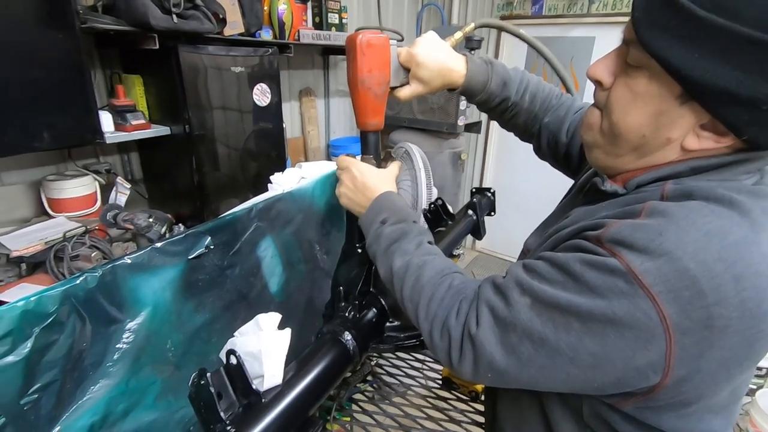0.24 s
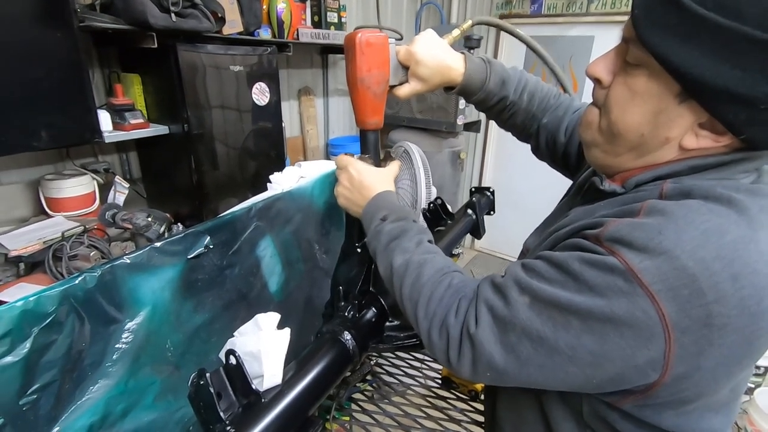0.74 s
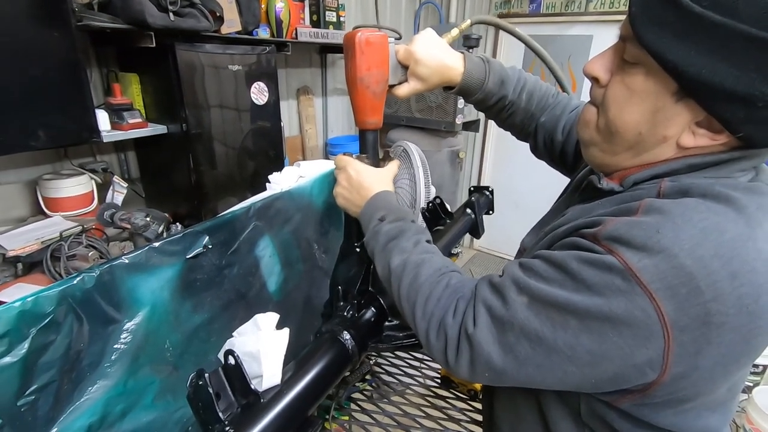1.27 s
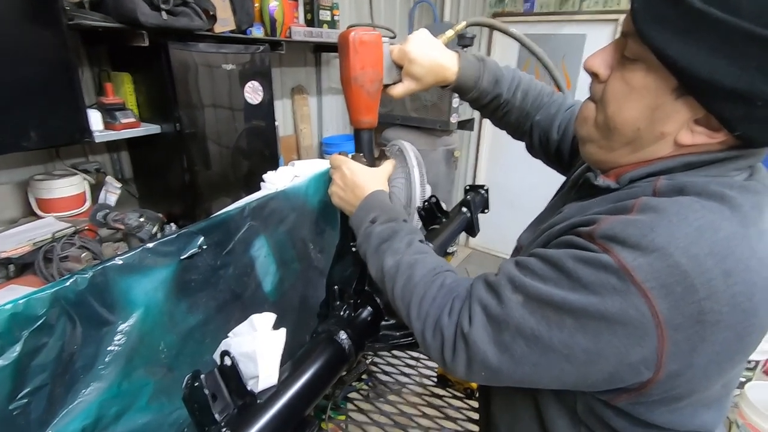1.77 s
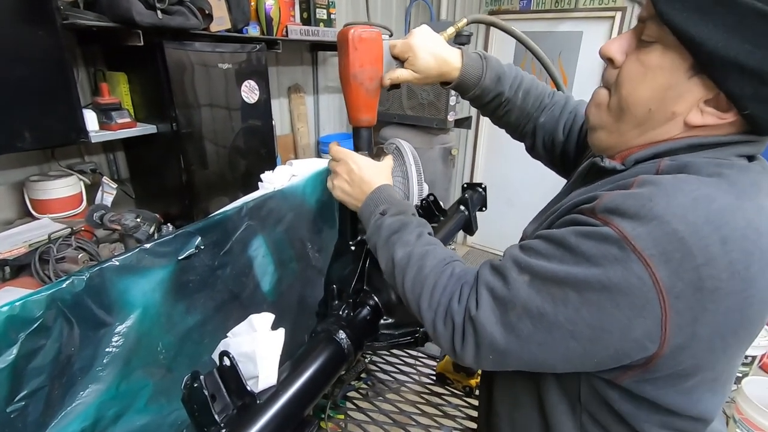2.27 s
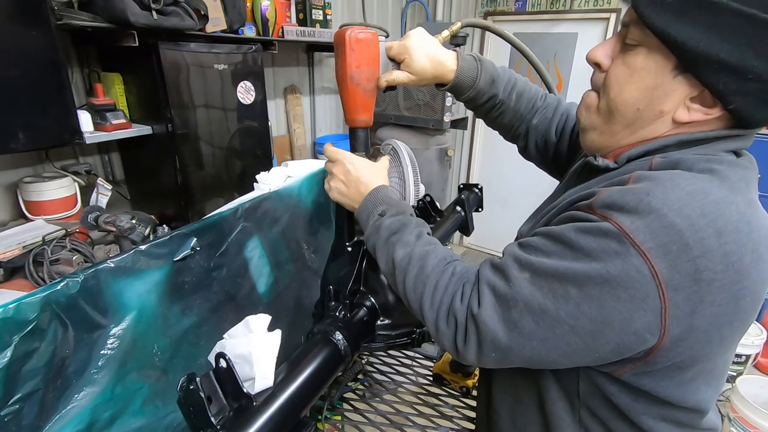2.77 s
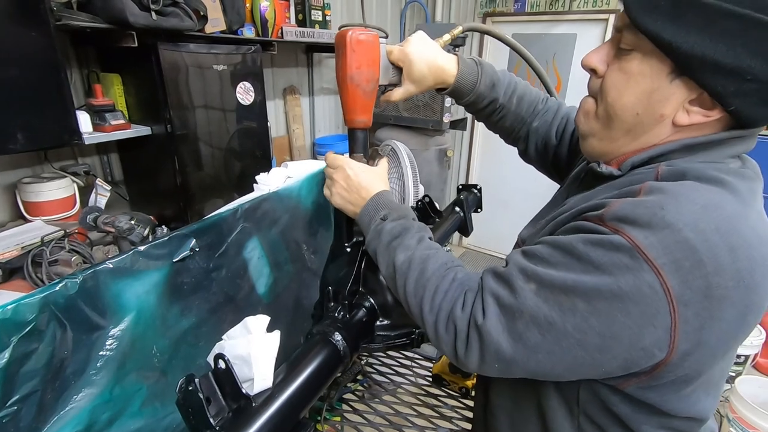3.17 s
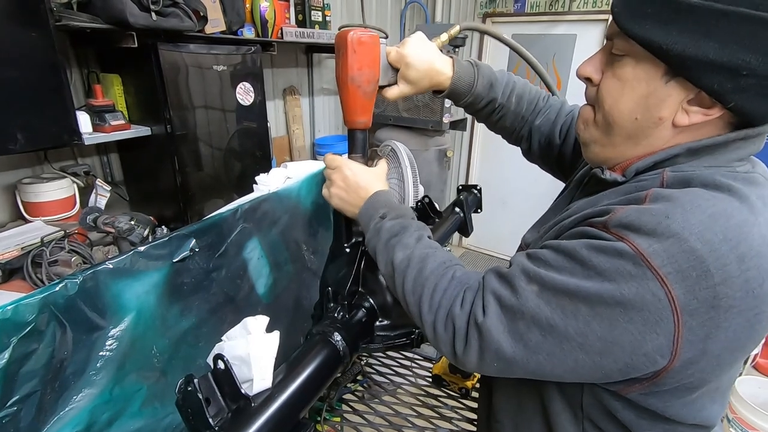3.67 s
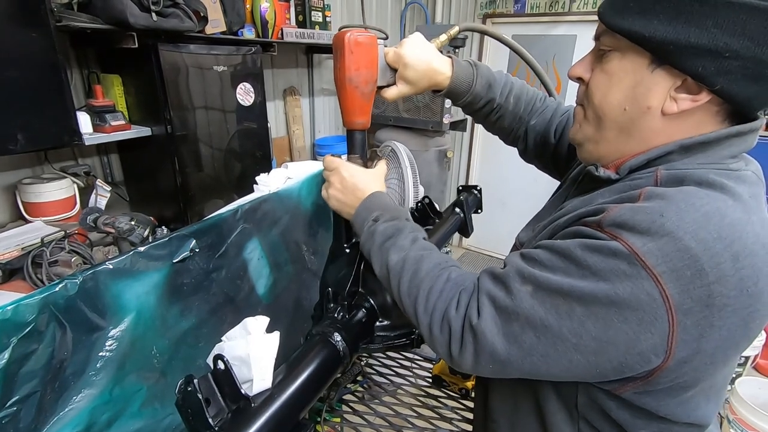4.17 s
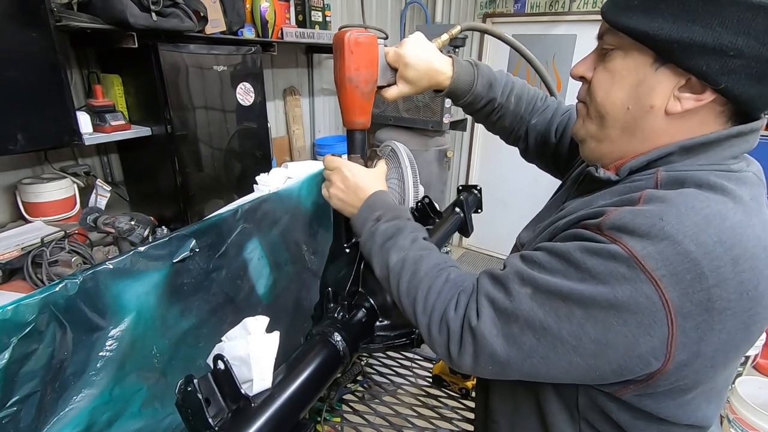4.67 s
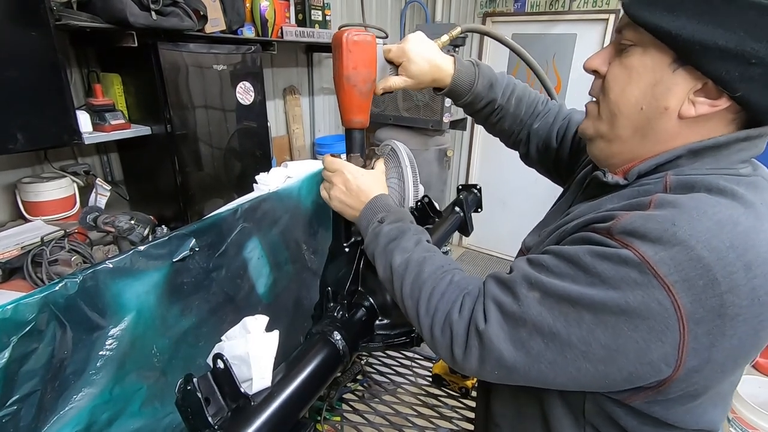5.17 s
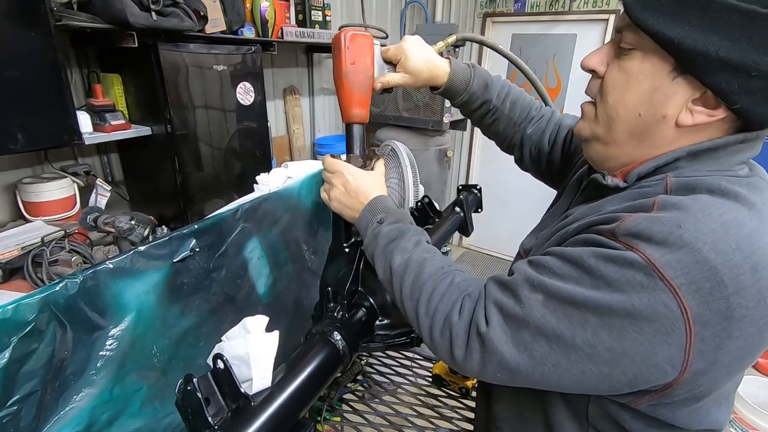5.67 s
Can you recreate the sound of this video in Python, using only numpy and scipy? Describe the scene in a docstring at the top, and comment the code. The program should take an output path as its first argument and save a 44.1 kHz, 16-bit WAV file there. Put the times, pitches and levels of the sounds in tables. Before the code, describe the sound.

From 0 to about 2.0 s an air impact wrench hammers at full force, roughly fifteen blows a second. Every blow is a hard, bright steel crack ringing the socket and heavy axle housing, uneven in strength and tone, with clacks and rattle between. Air hisses out and the motor throbs upward after each blow, over low gusty rumble. At 2.0 s the valve shuts with a shrill, ringing spit and the motor quickly runs down. Until 3.4 s there is a low drone and swelling faint hiss, with soft metallic clunks at about 2.1, 2.3, 2.5, 2.8 and 2.95 s. Loose jolts and dull thumps start the second burst, 3.43 to 5.0 s; from 4.74 s the exhaust eases, blows dull, and bleeding air whistles, dying soon after 5 s. Quiet drone remains, with a faint thump near 5.4 and a firmer cluster of clunks around 5.75-5.83 s. Close microphones, short garage reverberation.

```python
"""A pneumatic impact wrench hammers a big axle nut in two bursts in a small, cluttered garage.
Each blow is a hard pulse that rings anvil, socket and axle housing, with cam clacks and rattle in between.
It stalls the vane motor, which spins up again, venting noise and thumps at ever shorter gaps.
The valve spits after the first burst and bleeds a whistle around the end of the second.
In both pauses the socket clunks by hand, over a low drone, a faint hiss and a low rumble that fades out late."""
import sys
import numpy as np
from scipy import signal
from scipy.fft import rfft, irfft, next_fast_len
from scipy.io import wavfile

SR = 44100
rng = np.random.default_rng(int(sys.argv[2]) if len(sys.argv) > 2 else 0)


def to_wav(s):
    """Save 16-bit WAV."""
    ch = np.atleast_2d(s).T  # columns
    pcm = np.round(np.clip(ch, -1, 1) * 32767)  # PCM
    wavfile.write(sys.argv[1], SR, pcm.astype(np.int16))


N = 261513  # length in samples


def undb(db):
    """Decibels to gain."""
    return 10 ** (np.asarray(db) / 20)


def unit(x):
    """Scale to rms 1."""
    return x / np.sqrt(np.mean(x ** 2))


def curve(rows, axis):
    """One column of a table, joined by straight lines in time."""
    rows = np.array(rows)
    return np.interp(np.arange(N) / SR, rows[:, 0], rows[:, axis])


def since(s):
    """Seconds gone by since s; zero before it."""
    return np.maximum(np.arange(N) / SR - s, 0)


def through(x, response):
    """Pass a sound through an impulse response."""
    return signal.fftconvolve(x, response)[:N]


def colour(x, points, size=8192):
    """Minimum-phase filter of unit energy with the given (Hz, dB) shape."""
    hz, db = np.transpose(points)
    f = np.maximum(np.fft.rfftfreq(size, 1 / SR), 1)
    log_gain = np.log(undb(np.interp(np.log(f), np.log(hz), db)))
    # folding the cepstrum forward in time makes the filter causal
    cepstrum = irfft(log_gain)
    cepstrum[1:size // 2] *= 2
    cepstrum[size // 2 + 1:] = 0
    response = irfft(np.exp(rfft(cepstrum)))
    return through(x, response / np.linalg.norm(response))


def ring(x, modes):
    """Decaying sines set off by x: one two-pole resonator for each mode (Hz, dB, t60 s)."""
    out = 0
    for hz, db, t60 in modes:
        r = np.exp(-np.log(1000) / (t60 * SR))
        w = 2 * np.pi * hz / SR
        feedback = [1, -2 * r * np.cos(w), r * r]
        out = out + undb(db) * signal.lfilter([0, r * np.sin(w)], feedback, x + 1e-18)
    return out


def taps(times, sizes):
    """One impulse for each event."""
    out = np.zeros(N)
    index = np.clip(np.ravel(times) * SR, 0, N - 1).astype(int)
    np.add.at(out, index, np.ravel(sizes))
    return out


def chatter(pulses, decay_s):
    """Each impulse breaks into a short swell of tiny contacts with the same energy."""
    t = np.arange(SR // 4) / SR
    fade = np.exp(-t / decay_s) * (1 - np.exp(-t / .0005))
    return through(pulses, fade / np.linalg.norm(fade)) * rng.choice([-1, 1], N)


def treble(x, hz):
    """The part of a sound above hz."""
    return signal.sosfilt(signal.butter(1, hz, "high", fs=SR, output="sos"), x)


# How unlike the two microphones hear a diffuse field.
# Each row: frequency in Hz, side level in dB before the width is applied.
MIC_SPREAD = [(100, -46.5), (280, -14.5), (550, -7.5), (1100, -6.5), (2200, -9.5), (4000, -12.5),
              (8500, -3.5), (13000, -8.5)]


def pair(make, width):
    """Two microphones in a diffuse field: alike in the bass, unlike in the treble."""
    hz, db = np.transpose(MIC_SPREAD)
    mid, other = make(), make()
    size = next_fast_len(N)
    f = np.fft.rfftfreq(size, 1 / SR)
    gain = undb(np.interp(np.log1p(f), np.log(hz), db))
    side = width * irfft(rfft(other, size) * gain, size)[:N]
    return np.array([mid + side, mid - side])


# Reverberation of the garage. Each row: frequency in Hz, t60 in seconds.
REVERB_T60 = [(150, 0.62), (600, 0.38), (2500, 0.45), (6000, 0.53), (12000, 0.38)]


def garage(x, wet_db, width):
    """Direct sound plus the dense echoes of a cluttered room, noise that dies at its own rate in each band."""
    t = np.arange(SR) / SR
    hz, t60 = np.transpose(REVERB_T60)

    def echoes():
        f, when, cells = signal.stft(rng.standard_normal(SR), SR, nperseg=512)
        fade = np.exp(-np.log(1000) * when / np.interp(f, hz, t60)[:, None])
        build_up = 1 - np.exp(-t / 0.0017)
        tail = signal.istft(cells * fade, SR)[1][:SR] * build_up
        return through(x, tail / np.linalg.norm(tail))
    return x + undb(wet_db) * pair(echoes, width)


# Hammer blows, one for each turn of the motor. Each row: start in seconds, then in dB against an
# ordinary blow: weight, ping of the socket, snap, low clack, higher clang.
HAMMER_BLOWS = [(0.0075, -1, -17, -1, 6.5, 7), (0.0753, -0.5, 7, 5, 0, 5.5),
                (0.1415, 0.5, -14, -4.5, 5.5, -3.5), (0.2102, -3.5, -20, -1, 4, 7),
                (0.2772, -8.5, -5, 1, 0, 8.5), (0.3467, -3.5, 4.5, -7, -5, 8.5), (0.4133, 0, -13, -2, 3, 5),
                (0.482, -0.5, -17, -2, 5, 0), (0.5498, -3.5, -12, -11, 3.5, 10.5),
                (0.619, -1, -6, -2, 4, 5), (0.6862, 0, -8, -9, -5.5, 6.5), (0.7522, -2, 5.5, 4, -3.5, 7),
                (0.8177, -1.5, 0.5, 2, -9, -11), (0.8837, -0.5, -3, 13.5, -4.5, -2.5),
                (0.9458, -6, -1.5, 5, 4, -2), (1.014, -9.5, 1, 1, -1.5, 5.5), (1.0828, -3, 2, 5, 2.5, 0.5),
                (1.1514, 0, 7, 3, -1, -11.5), (1.2176, -1.5, 4.5, 7.5, 4.5, 6),
                (1.283, -7.5, -3, -4, 0.5, 5.5), (1.3487, 2, -15, 1, -4.5, 0),
                (1.418, -2.5, 6, 0, -4, -5.5), (1.487, -4, 0, 6, -10.5, 3.5), (1.5537, 2, 4, 4, -5.5, 0.5),
                (1.6229, 1, 6, 7, -1, -0.5), (1.6909, -6.5, -7.5, -1, 5.5, 7.5),
                (1.7592, -2, 2.5, 5, 1, 3.5), (1.8296, -3, 8.5, 2.5, 5.5, 3.5), (1.8992, -4, 6, 0, 4, 1),
                (1.9715, -0.5, -9, 2.5, -3, 8.5), (3.444, -5.5, -3.5, -2, 8.5, -7.5),
                (3.505, -0.5, 4.5, 12, -5, 3.5), (3.566, -1, -2, -7, -3, -5.5),
                (3.6308, -2, 5.5, 11.5, 3.5, 0), (3.7004, -1, -2, 9, -8, -4.5), (3.766, -3.5, 2, 8, 4, -8),
                (3.8328, 0, 1.5, -4, -1, -1.5), (3.9025, 1, -11.5, -4, 9, 1.5),
                (3.9719, -4.5, 0, 7, -0.5, -0.5), (4.038, 1, 5, -8, -2, -13), (4.1063, -2, -3, 10, -3, 0),
                (4.1753, -3, 0.5, 9, -4, -3), (4.243, -3, 3, 2, 3.5, -14), (4.3132, -7.5, 3, 9, -3, 0),
                (4.3812, -1.5, 0, 7, -8.5, 1), (4.4494, -0.5, 2, -6, -14.5, -6),
                (4.5177, -0.5, 2, -10, 3, 0.5), (4.5867, -1, 4, -9, -13, -3), (4.6556, 1, 1, -3, 1, -6),
                (4.7252, -1, 3, -9, 1.5, -1.5), (4.7953, 0.5, -7, 1, -8, 4),
                (4.8646, 0.5, -6, -4.5, -16, 6), (4.933, 2.5, -11, 0, 0, 1), (5.0068, 0.5, -6, 5, -6.5, -7)]
LONGEST_TURN_S = .1  # a longer gap between blows is a pause


def turns():
    """Start and length in seconds of every motor turn, from one blow to the next."""
    s = np.array(HAMMER_BLOWS)[:, 0]
    running = np.diff(s) < LONGEST_TURN_S
    return s[:-1][running, None], np.diff(s)[running, None]


# Trigger held. Each row: pulled at in seconds, let go at in seconds.
TRIGGER_HELD = [(-1, 2.0), (3.433, 5.0)]
EASE_S = 4.74  # the trigger is eased from here until the second burst ends


def eased():
    """How far the valve has been eased shut, 0-1."""
    return np.minimum(since(EASE_S) / (TRIGGER_HELD[1][1] - EASE_S), 1)


COAST_HZ, COAST_S = 190, .2  # puffs per s at first, time constant of the falling speed


def coast(off):
    """Swing of the vane puffs as the free rotor runs down after the trigger is let go."""
    return np.sin(2 * np.pi * COAST_HZ * COAST_S * (1 - np.exp(-since(off) / COAST_S)))


# Spectra of the exhaust hiss, of the vane puffs, and of air buffeting the microphones.
# Each row: frequency in Hz, level in dB.
EXHAUST_SPECTRUM = [(200, 3.5), (500, -10.5), (820, -4), (1050, 2), (1350, -2.5), (2300, -1), (3500, -0.5),
                    (5500, -3.5), (7500, -6.5), (9300, -5), (10700, -26.5), (12300, -20.5), (15000, -29)]
PUFF_SPECTRUM = [(30, -19.5), (60, -12), (110, -1.5), (200, 1), (400, 5.5), (800, -7.5), (1500, -44)]
BUFFET_SPECTRUM = [(15, 1.5), (28, -13.5), (42, -12), (66, 5.5), (95, -1.5), (140, -2), (400, -75.5)]
# Vane puffs as the hose pressure surges and sags. Each row: time in seconds, relative level in dB.
PUFF_SURGE = [(0, -28.5), (.6, -26), (.74, -25.5), (.95, -29), (1.55, -27), (1.85, -25.5), (2.05, -27.5),
              (3.48, -24), (3.62, -23.5), (3.72, -27), (4.3, -29), (4.95, -28)]
# Low resonances of the garage, then of the motor casing that the vanes rattle.
# Each row: frequency in Hz, level in dB, t60 in seconds.
ROOM_MODES = [(135.3, -2.5, 0.12), (187.05, 0, 0.33), (247.3, -0.5, 0.43), (387.6, 4.5, 0.21)]
CASING_MODES = [(748, -7, .08), (957, 2.5, .08), (1072, 1, .07)]
# How hard the casing is rattled. Each row: time in seconds, relative level in dB.
CASING_RATTLE = [(0, -57.5), (.6, -54), (1.2, -57), (1.58, -46.5), (1.75, -58.5), (1.98, -47), (3.5, -55),
                 (4.2, -56), (4.95, -51.5)]
VANES = 6
COAST_DB_PER_S = 120  # fall of the coasting puffs


def motor():
    """From each stall the rotor speeds up, so its vanes vent at ever shorter gaps: a rising throb in every turn."""
    start, length = turns()
    chance = rng.standard_normal((len(start), 3))
    throb, vent = np.zeros(N), np.zeros(N)
    for s, span, (early, turn, push) in zip(start[:, 0], length[:, 0], chance):
        stall = .31 + .008 * early  # share of the turn
        first, last = int((s + stall * span) * SR), int((s + span) * SR)
        run = np.linspace(0, 1, last - first)
        phase = 2 * np.pi * (VANES + .06 * turn) * run ** 1.6
        # chamber pressure builds after the stall and sags as the rotor gathers speed
        build, end = np.minimum(run / .22, 1), np.minimum((1 - run) / .04, 1)
        pressure = build * undb(-7 * run + .8 * push) * end
        throb[first:last] = pressure * (np.sin(phase) + .22 * np.sin(2 * phase) + .15 * np.sin(3 * phase))
        vent[first:last] = pressure * (1 + 1.61 * np.cos(phase))
    # with the trigger let go the rotor coasts, slower and weaker
    for (_, off), db in zip(TRIGGER_HELD, (-5, -16)):
        throb = throb + undb(db - COAST_DB_PER_S * since(off)) * coast(off)
    opening = []
    for on, off in TRIGGER_HELD:
        opening += [(on, 0), (on + 0.016, 1), (off, 1), (off + 0.11, 0)]
    flow = curve(opening, axis=1)
    jet = (flow + undb(-5.0) * vent) * rng.standard_normal(N)
    hiss = undb(-33.5) * colour(jet, EXHAUST_SPECTRUM) * (1 - eased())
    puffs = throb * undb(curve(PUFF_SURGE, axis=1))
    thump = undb(-15.0) * colour(puffs, PUFF_SPECTRUM)
    boom = undb(-44) * ring(thump, ROOM_MODES)
    # the slowest puffs rock the two microphones in opposite senses
    rocking = undb(-30.5) * colour(puffs, BUFFET_SPECTRUM) * np.array([[-.8], [1.1]])
    rattle = vent * rng.standard_normal(N) * undb(curve(CASING_RATTLE, axis=1))
    casing = undb(-8.5) * ring(rattle, CASING_MODES)
    airy = garage(hiss, wet_db=0.0, width=3.06)
    return airy + garage(casing, wet_db=-3.5, width=1.5) + thump + boom + rocking


# Gusts of exhaust air reach the microphones. Each row: start in seconds, end in seconds, level in dB.
AIR_GUSTS = [(0, 0.62, -27), (1.588, 2.11, -27), (3.474, 3.566, -27), (3.85, 4.403, -35)]
GUST_RISE_S, GUST_FALL_S = 0.044, 0.044
DRAUGHT_DB = -36.5  # a light draught under the gusts
RUMBLE_FADE_S, RUMBLE_FADE_DB_PER_S = 4.75, 60  # from here the low rumble fades out


def wind():
    """Strength of the low rumble: a light draught and gusts that rise, hold and fall, with a late fade-out."""
    gusts = 0
    for on, off, db in AIR_GUSTS:
        rise = np.minimum(since(on) / GUST_RISE_S, 1)
        gusts = gusts + undb(db) * rise * np.exp(-since(off) / GUST_FALL_S)
    return np.hypot(gusts, undb(DRAUGHT_DB)) * undb(-RUMBLE_FADE_DB_PER_S * since(RUMBLE_FADE_S))


# Spectrum of the low drone. Each row: frequency in Hz, level in dB.
DRONE_SPECTRUM = [(15, -51.5), (25, -31), (91, -23), (123, -4.5), (199, -10), (230, -14.5), (334, -22.5),
                  (357, -23.5), (403, -19.5), (454, -43.5), (600, -22), (780, -48), (1320, -120)]
# The drone's loudness. Each row: time in seconds, level in dB.
DRONE_FADER = [(2.25, -48.5), (2.55, -42.5), (2.85, -40), (3.0, -38.5), (3.35, -39.5), (3.7, -36),
               (5.2, -45.5), (5.7, -39)]
# Two spectra of the faint hiss, for the first and the second pause.
# Each row: frequency in Hz, level in dB.
HISS_SPECTRA = [
    [(200, 1.5), (600, 0.5), (1100, 5.5), (2300, 1.5), (3200, -1.5), (5000, -11.5), (8000, -16.5),
     (9500, -22.5), (11500, -62.5)],
    [(200, 4), (600, -7), (1100, -3.5), (1750, -2.5), (2600, -9.5), (4600, -18.5), (5600, -34.5),
     (9000, -42), (11500, -83)],
]
# The faint hiss swells through each pause.
# Each row: start in seconds, end in seconds, level in dB at first, level in dB at last.
PAUSE_SWELLS = [(2.25, 3.4, -57.5, -47.5), (5.25, 5.75, -53.5, -46.5)]


def background():
    """Coloured noise: a low drone, a faint hiss that turns duller later on, and air rumbling on the microphones."""
    drone = pair(lambda: unit(colour(rng.standard_normal(N), DRONE_SPECTRUM)), .8)
    drone = drone * undb(curve(DRONE_FADER, axis=1))
    dull = curve([(PAUSE_SWELLS[0][1], 0), (PAUSE_SWELLS[1][0], 1)], axis=1)

    def faint_hiss():
        bright_hiss, dull_hiss = [unit(colour(rng.standard_normal(N), shape)) for shape in HISS_SPECTRA]
        return (1 - dull) * bright_hiss + dull * dull_hiss
    swell = []
    for start, end, first_db, last_db in PAUSE_SWELLS:
        swell += [(start, first_db), (end, last_db)]
    hiss = pair(faint_hiss, 1.0) * undb(curve(swell, axis=1))
    rumble = unit(colour(rng.standard_normal(N), BUFFET_SPECTRUM)) * wind()
    # the two microphones are pushed in opposite senses
    return drone + hiss + rumble * np.array([[-.7], [1.3]])


BEND_S, BEND_HZ = .0016, 2000  # bending waves arrive this late at BEND_HZ, the treble sooner


def bend(x):
    """Dispersion in steel: delay falls as one over the root of frequency and smears a pulse."""
    size = next_fast_len(N + SR)
    f = np.fft.rfftfreq(size, 1 / SR)
    lag = np.exp(-2j * np.pi * BEND_S * 2 * np.sqrt(BEND_HZ * f))
    return irfft(rfft(x, size) * lag, size)[:N]


# Individually timed clacks, strong and weak, of the hammer riding over its cam.
# Each row: start in seconds, weight in dB, snap in dB, both against an ordinary blow.
CAM_CLACKS = [(0.0402, -17, 0.5), (0.053, -4, 5), (0.1734, -25, -10), (0.1873, 2, -11), (0.2418, -5, -2),
              (0.255, -6.5, -4), (0.3114, -12, 4), (0.3242, -3, -1), (0.4467, -16, -7), (0.4605, 0, -7),
              (0.5142, -9, 4), (0.5274, 0, -9), (0.5832, -1, 2), (0.6504, -15, -4), (0.6645, 0, -8),
              (0.7302, 0.5, 2), (0.8619, -0.5, -2), (0.9912, 0, -15), (1.0453, -3, -19), (1.0594, -7, -25),
              (1.1136, -19, 5), (1.1953, 0.5, -12), (1.3117, -8, -0.5), (1.3956, -6, -5),
              (1.449, -7.5, -14.5), (1.4647, -3.5, -7), (1.5306, -6.5, -9), (1.722, -13, -14),
              (1.7382, -1, -13), (1.8068, -2, -14.5), (1.8767, -9.5, -5.5), (1.9467, -8, 5),
              (3.6094, -16, -13), (3.8634, -13, -2), (3.9332, -12, -9), (3.9472, -1.5, -2)]
# The loose socket jolts as the trigger is pulled or let go.
# Each row: start in seconds, weight in dB, snap in dB.
SOCKET_JOLTS = [(1.997, -15, -5), (3.435, -17, -9), (3.441, -9, -4), (3.453, -2.5, 6), (3.471, 0, 9),
                (3.482, 1.5, 2), (4.977, -2, -1), (5.0432, 2, -13)]
# Further clacks come at these shares of a turn.
CLACK_SHARES = (.46, .675)
CLACK_SNAP_DB, CAM_DB, RATTLE_DB = -6, -8, -12


def clatter(count=7):
    """Contacts between blows, as body and edge: cam clacks, jolts, a rattle that thickens as the rotor speeds up."""
    start, length = turns()
    s, weight_db, snap_db = np.transpose(list(CAM_CLACKS) + list(SOCKET_JOLTS))
    chance = rng.standard_normal((len(start), 2, 2))
    cam_s = start + length * (np.array(CLACK_SHARES) + .015 * chance[:, 0])
    cam = taps(cam_s, undb(CAM_DB + 2 * chance[:, 1]))
    # the root crowds the contacts towards the end of the turn
    rattle_s = start + length * np.sqrt(rng.uniform(.01, .97, (len(start), count)))
    rattle = taps(rattle_s, undb(RATTLE_DB + 3 * rng.standard_normal(rattle_s.shape)))
    body = chatter(taps(s, undb(weight_db)) + cam, 0.0031) + chatter(rattle, 0.0012)
    edge = chatter(taps(s, undb(CLACK_SNAP_DB + snap_db)) + undb(-3.5) * cam, 0.0028)
    # a jolt opens with one hard contact
    jolt_s, jolt_db, _ = np.transpose(SOCKET_JOLTS)
    return body + bend(taps(jolt_s, undb(jolt_db - 4))), edge


DETUNE, SCATTER_DB = .022, 2  # spread from blow to blow: share of each mode's pitch, its strength


def strike(times, levels_db, modes):
    """Each blow lands a little differently and rings the modes with its own tuning and strengths."""
    t = np.arange(SR // 10) / SR
    hz, db, t60 = np.transpose(modes)[:, :, None]
    out = np.zeros(N + len(t))
    chance = rng.standard_normal((len(times), 2, len(modes), 1))
    for s, level_db, (tune, strength) in zip(times, levels_db, chance):
        gain = undb(level_db + db + SCATTER_DB * strength)
        tone = np.sin(2 * np.pi * hz * (1 + DETUNE * tune) * t)
        rings = gain * np.exp(-np.log(1000) * t / t60) * tone
        out[int(s * SR):][:len(t)] += rings.sum(axis=0)
    return out[:N]


# Spectra of steel on steel: its body, then its bright edge. Each row: frequency in Hz, level in dB.
CRACK_SPECTRUM = [(150, -31.5), (600, -23.5), (1100, -3.5), (1450, -7.5), (1900, 6), (2700, 4), (3600, 3.5),
                  (4800, -3), (5400, -15.5), (6400, -7), (9400, -8.5), (11000, -40), (14500, -34)]
SNAP_SPECTRUM = [(1500, -28.5), (3800, 6), (5500, 5.5), (6300, 11), (8200, 3), (9300, -6), (10700, -27),
                 (14500, -23.5)]
# Modes of the anvil (two for the clack, two for the clang, then the rest), of the socket's ping and
# of the axle housing. Each row: frequency in Hz, level in dB, t60 in seconds.
ANVIL_MODES = [(1885, -4.5, 0.028), (2046, -2.5, 0.016), (2433, -6.5, 0.036), (2638, -5, 0.023),
               (3850, -18.5, .018), (4880, -19, 0.035), (6220, -4.5, 0.017), (8980, -12.5, 0.034)]
PING_MODES = [(4583, 0.0058, 0.023)]
HOUSING_MODES = [(372, 6, 0.34), (517, -9, .35), (722, -7, 0.3), (772, -6, .2), (846, -2, 0.12),
                 (958, 6, 0.27), (1075, -2, 0.15), (1262, -5, .12), (1590, 4, 0.36), (1800, -9, 0.12),
                 (1983, -8, .2), (2178, -6, .18), (2360, -2, 0.11), (4150, -21, .12)]
# Modes of the socket, seated anew between the bursts. Each row: frequency in Hz,
# level in dB in the first burst, level in dB in the second, t60 in seconds.
SOCKET_MODES = [(2050, -7, -10, .04), (2340, -4, -10, .05), (2530, -11, -2, .08), (3170, -10, -10, .1),
                (3310, -13, -7, .1), (3362, -12, -16, .1), (3505, -16, -7, .08), (3900, -11, -11, .05),
                (4540, -7, -8, .07), (4910, -14, -7, .07), (5310, -16, -11, .07), (6200, -4, -3, .03),
                (8850, -9, -9, .025), (9150, -9, -9, .03)]
# Grip of the socket on the housing. Each row: time in seconds, relative level in dB.
HOUSING_GRIP = [(0, -34.5), (.85, -31), (1.55, -28), (2.0, -31.5), (3.5, -38), (4.5, -39.5), (4.9, -28),
                (5.01, -33.5)]
# an ordinary blow: its knock, the anvil, the socket's ping, the bright snap, the socket's rebound
KNOCK_DB, STRIKE_DB, PING_DB, SNAP_DB, REBOUND_DB = 2, -20, -23, -6.5, -1.5
DULL_BLOW_HZ = 7200  # the last blows sound duller, losing their edge above this


def hammer():
    """Every blow is a hard pulse into anvil and socket, then a short rebound; other contacts clatter between."""
    s, weight_db, ping_db, snap_db, clack_db, clang_db = np.transpose(HAMMER_BLOWS)
    blow = bend(taps(s, undb(weight_db)))
    body, edge = clatter()
    rebound = chatter(taps(s + BEND_S, undb(weight_db)), 0.0017)
    contact = undb(KNOCK_DB) * blow + undb(REBOUND_DB) * rebound + body
    snap = taps(s + BEND_S / 2, undb(SNAP_DB + snap_db)) + edge
    crack = colour(contact, CRACK_SPECTRUM) + colour(snap, SNAP_SPECTRUM)
    clack = strike(s, clack_db, ANVIL_MODES[:2])
    clang = strike(s, clang_db, ANVIL_MODES[2:4])
    struck = clack + clang + strike(s, weight_db, ANVIL_MODES[4:])
    anvil = undb(STRIKE_DB) * (bend(struck) + undb(-4) * ring(body, ANVIL_MODES))
    ping = ring(bend(taps(s, undb(PING_DB + ping_db))), PING_MODES)
    reseated = since(PAUSE_SWELLS[0][1]) > 0
    socket = 0
    for hz, first_db, second_db, t60 in SOCKET_MODES:
        seat = undb(np.where(reseated, second_db, first_db))
        socket = socket + ring(contact * seat, [(hz, -31, t60)])
    steel = crack + anvil + ping + socket
    # the dulling keeps time with the easing of the trigger
    for _ in range(2):
        steel = steel - eased() * treble(steel, DULL_BLOW_HZ)
    # the short steel contacts reach the lowest modes of the housing only weakly
    push = treble(contact, 550) * undb(curve(HOUSING_GRIP, axis=1))
    housing = undb(-12.5) * ring(push, HOUSING_MODES)
    return garage(steel + housing, wet_db=-7.5, width=1.05)


# Spectra of the spit as the valve shuts and of the air bleeding past it.
# Each row: frequency in Hz, level in dB.
SPIT_SPECTRUM = [(1000, -3.5), (4000, -7.5), (6200, 5), (8400, -3), (9350, 10.5), (10000, -7),
                 (10800, -67.5), (13800, -38.5), (14550, -18), (15300, -37)]
BLEED_SPECTRUM = [(300, 6.5), (650, -5.5), (1000, -1.5), (1400, -9), (2200, -3.5), (3400, -1), (4900, -4.5),
                  (5300, -20), (9000, -49), (12000, -57)]
# Air passages that ring after the spit, and the whistle of air through the half-shut valve.
# Each row: frequency in Hz, level in dB, t60 in seconds.
PASSAGE_MODES = [(6330, -36, .45), (6440, -38, .35), (7750, -42, .4), (9330, -39, .2)]
WHISTLE_MODES = [(620, -54, .3), (1814, -49, .35), (3290, -49, .25), (3500, -48, .25), (3830, -49, .2),
                 (4895, -51, .35)]
# bleeding air: level, how long it outlasts the trigger, its fall
BLEED_DB, BLEED_HOLD_S, BLEED_FALL_DB_PER_S = -28, 0.008, 129
CHOP = .6  # how deeply the coasting rotor chops the escaping air, 0-1


def release():
    """Shutting, the valve spits a shrill, ringing noise burst; eased, it bleeds duller noise that whistles."""
    (_, first_off), (_, second_off) = TRIGGER_HELD
    shut = chatter(taps(first_off - .002, 0.74), 0.0069)
    spit = undb(8.5) * colour(shut, SPIT_SPECTRUM)
    passages = ring(shut, PASSAGE_MODES) * (1 + CHOP * coast(first_off))
    fall_db = BLEED_FALL_DB_PER_S * since(second_off + BLEED_HOLD_S)
    leak = np.sqrt(eased()) * undb(BLEED_DB - fall_db) * rng.standard_normal(N)
    leak = leak * (1 + CHOP * coast(second_off))
    bleed = treble(colour(leak, BLEED_SPECTRUM), 150)
    return garage(spit + bleed + passages, wet_db=-2.0, width=0.38) + ring(leak, WHISTLE_MODES)


# The socket drops back and is set on the nut by hand. Each row: start in seconds, thud in dB,
# click in dB, click centre in Hz, ring of the tool in dB, ring of the housing in dB,
# left minus right in dB (approximate).
SOCKET_CLUNKS = [(2.094, -20, -14, 1500, -63, -68, 0), (2.114, -26, -14.5, 1380, -60, -64, 3),
                 (2.323, -17, -16.5, 2100, -48.5, -51.5, 3), (2.535, -12.5, -25, 3200, -41, -64, 3.5),
                 (2.769, -14.5, -19, 2650, -46, -53.5, 4), (2.95, -20, -20, 3000, -47, -69, 5),
                 (5.747, -31, -38.5, 1800, -54, -56, -2), (5.767, -14, -22, 1900, -63, -52, 4),
                 (5.775, -21, -25, 2100, -58, -61, 0), (5.803, -7.5, -21, 2300, -62, -56, -1),
                 (5.8189, 0.5, -11.5, 2200, -52, -48, -5), (5.8245, -6.5, -15, 2300, -66, -32.5, 5)]
# Spectrum of the thud. Each row: frequency in Hz, level in dB.
THUD_SPECTRUM = [(80, -13), (200, 2), (420, -3.5), (600, 7.5), (690, 7), (860, 12.5), (1100, 6),
                 (1400, 1.5), (2200, -3), (3000, -8), (4500, -13), (5800, -36), (9000, -58)]
# A click's spectrum about its centre. Each row: multiple of the centre, level in dB.
CLICK_SHAPE = [(.3, -2), (.8, -4), (1, 16), (1.2, 0.5), (1.7, 1.5), (2.2, -9.5), (2.9, -26), (5.5, -35)]
# Modes of the wrench body. Each row: frequency in Hz, level in dB, t60 in seconds.
TOOL_MODES = [(335, -1, .08), (578, 3, .09), (622, 2, .17), (860, 0, .07), (953, 9.5, 0.13),
              (1066, -2, 0.13), (1490, -5, .05), (2630, -9, .05)]
BOUNCE_S, BOUNCE_DB = 0.02, -6.5  # one bounce: delay, and level against the first touch
BOOM_DB, BOOM_LAG_S = -32.5, .025  # drive and delay of the room's boom


def clunks():
    """Socket on nut: a dull thud and a dry click of its own pitch bounce once and ring tool and housing."""
    dry, lean, boom_taps = 0, 0, 0
    blunt = signal.butter(2, 4500, fs=SR, output="sos")
    for s, thud_db, click_db, click_hz, tool_db, housing_db, pan_db in SOCKET_CLUNKS:
        knock = taps(s, 0.93)
        touches = knock + taps(s + BOUNCE_S, undb(BOUNCE_DB))
        click_spectrum = [(click_hz * multiple, db) for multiple, db in CLICK_SHAPE]
        click = undb(click_db) * colour(chatter(touches, .005), click_spectrum)
        thud = undb(thud_db) * colour(chatter(touches, .011), THUD_SPECTRUM)
        rings = undb(tool_db) * ring(touches, TOOL_MODES) + undb(housing_db) * ring(knock, HOUSING_MODES)
        sound = thud + click + signal.sosfilt(blunt, rings)
        dry = dry + sound
        lean = lean + sound * (undb(pan_db / 2) - 1)
        # only the clunks of the first pause set off a low boom in the room
        if s < PAUSE_SWELLS[0][1]:
            boom_taps = boom_taps + taps(s + BOOM_LAG_S, undb(BOOM_DB))
    boom = ring(boom_taps, ROOM_MODES[:2])
    return garage(dry, wet_db=-3.0, width=1.6) + boom + lean * np.array([[1], [-1]])


# The wrench kicks in the hand or is shifted. Each row: start in seconds, level in dB.
HAND_KICKS = [(2.987, -21), (3.472, -8.5), (3.54, -10), (3.666, -22), (5.384, -26), (5.876, -20)]
# Mode of the thump. Each row: frequency in Hz, level in dB, t60 in seconds.
KICK_MODES = [(145, 0.0031, 0.017)]


def kicks():
    """Dull thumps: one short low mode set off by each kick."""
    return ring(sum(taps(s, -undb(db)) for s, db in HAND_KICKS), KICK_MODES)


def scene():
    """Wrench, handling and room."""
    return motor() + background() + hammer() + release() + clunks() + kicks()


TOP_HZ = 15300


def record(dry):
    """Soft saturation rounds the highest peaks, then a steep low-pass cuts the top."""
    low_pass = signal.ellip(10, .2, 80, TOP_HZ, fs=SR, output="sos")
    return signal.sosfilt(low_pass, np.tanh(dry))


dry = scene()
out = record(dry)
to_wav(out)
```